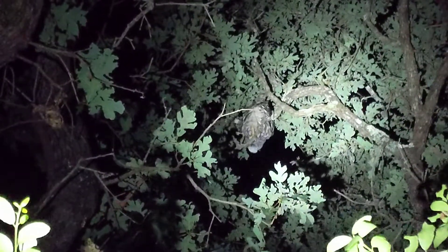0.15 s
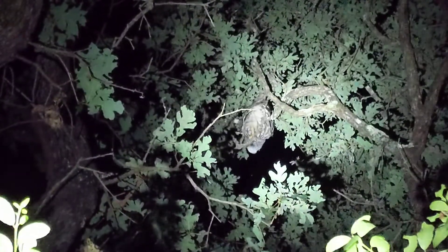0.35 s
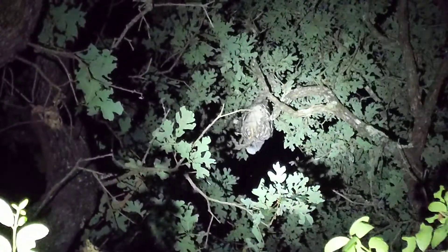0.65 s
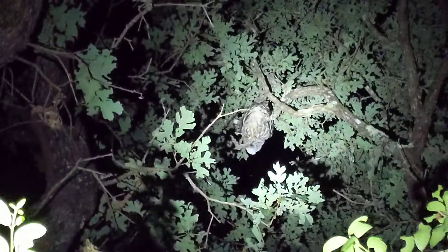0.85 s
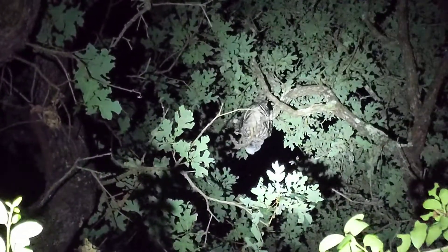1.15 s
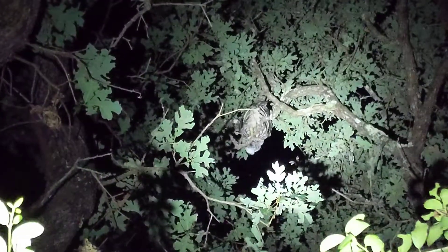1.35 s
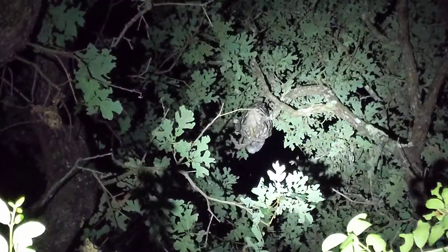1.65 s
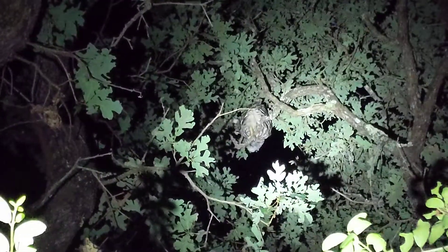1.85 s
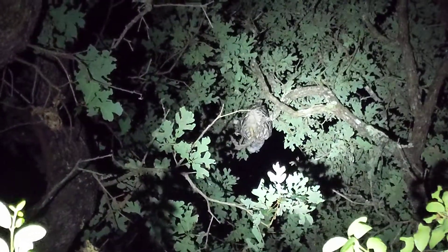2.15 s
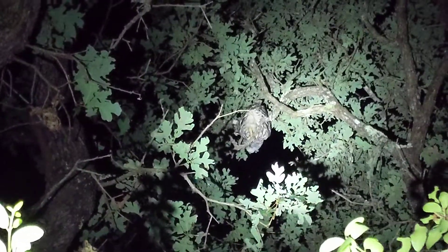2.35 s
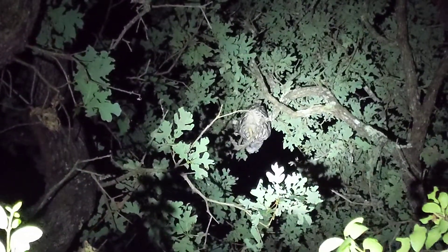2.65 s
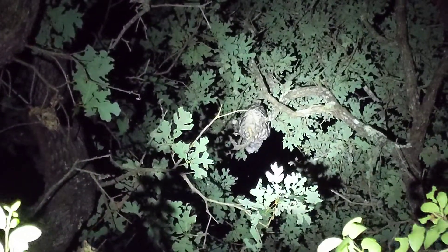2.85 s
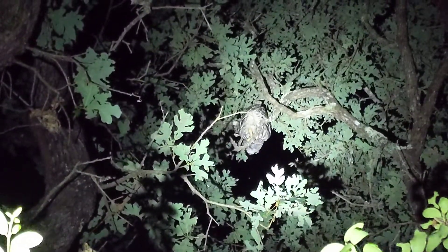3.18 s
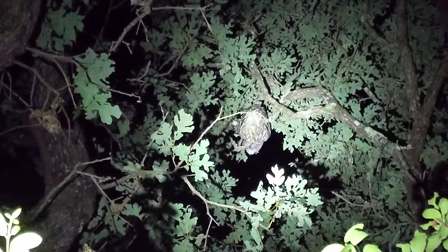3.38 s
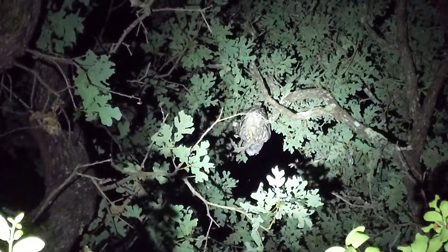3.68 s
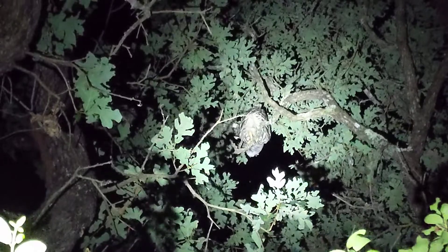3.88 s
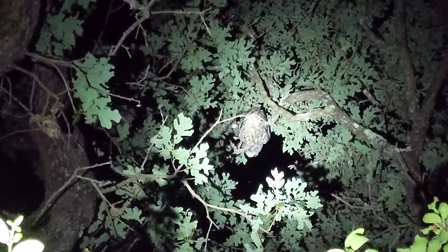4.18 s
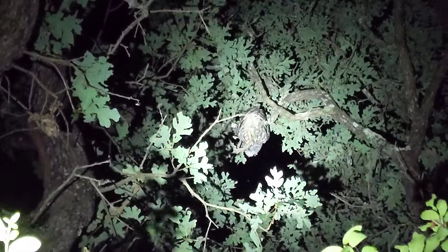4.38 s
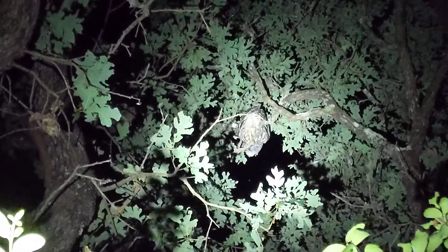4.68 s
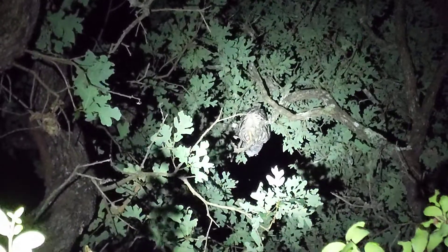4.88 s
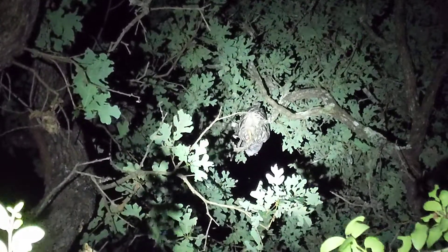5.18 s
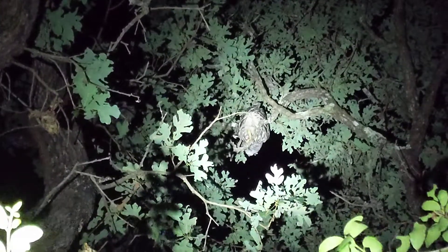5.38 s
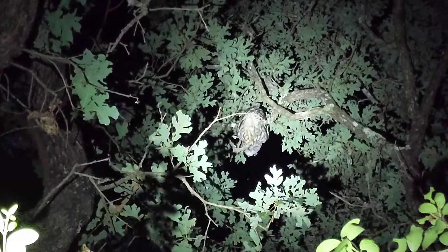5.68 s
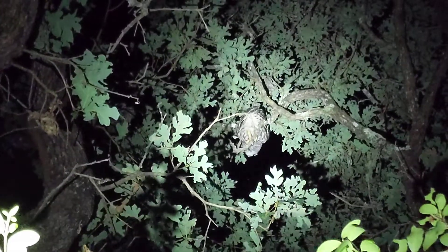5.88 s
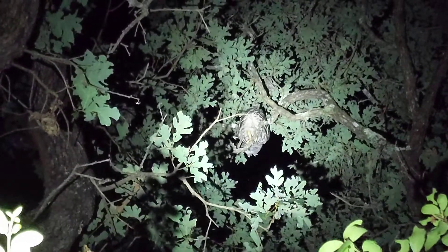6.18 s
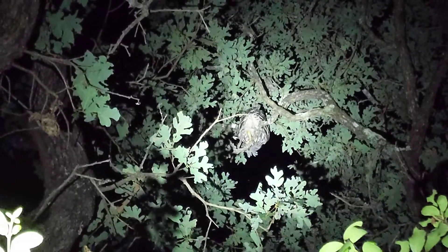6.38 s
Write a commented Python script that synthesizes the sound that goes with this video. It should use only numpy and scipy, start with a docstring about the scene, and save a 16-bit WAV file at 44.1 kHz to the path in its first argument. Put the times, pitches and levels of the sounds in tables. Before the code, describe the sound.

In a quiet wood at night, an owl just above the microphone gives three quick hoots and a long final one, each rising from a creak to a clear note and dropping. Afterwards soft crickets and a distant insect chorus carry on. Off to the left, a small animal makes a few faint squeaks, and later four sharp, high ones.

```python
"""A barred owl hoots close overhead in an oak wood at night: three short calls, then a long one.
Each hoot climbs from a creak, flips up to a nearly pure high note, drops back and collapses.
Off to the left a small animal squeaks faintly, then four times sharply near the end.
To the right two crickets chirp with their wings; farther out, insects trill and a chorus hums.
Leaves and trunks throw the nearer calls back to the microphone over a low murmur of air."""
import sys
import numpy as np
from scipy import signal
from scipy.fft import rfft, irfft, next_fast_len
from scipy.io import wavfile
from scipy.ndimage import uniform_filter1d, map_coordinates

SR = 44100
rng = np.random.default_rng(int(sys.argv[2]) if len(sys.argv) > 2 else 0)


def unload_wav(signal):
    """Save mono or channel-first audio to the path in sys.argv[1] as 16-bit WAV at rate SR, clipped to [-1, 1]."""
    wavfile.write(
        sys.argv[1],
        SR,
        np.round(np.clip(np.atleast_2d(signal).T, -1, 1) * 32767).astype(np.int16),
    )


N = 287973

# the owl's hoots: start t/s, flip up t/s, drop back t/s, end t/s, f/Hz before the flip, top f/Hz,
# high-note gain/dB, brightness/dB
OWL_HOOTS = [(.061, .141, .169, .222, 336, 478, -1.5, -2.5), (.385, .464, .503, .556, 356, 497, -2, -3),
             (.703, .78, .823, .876, 364, 514, -2.5, -1), (.896, .957, 1.188, 1.507, 385, 590, 0, -1)]
# its throat with the bill closed: f/Hz, relative level/dB
OWL_THROAT = [(140, -19), (240, -15), (290, -10.5), (340, -4.5), (480, 3.5), (610, 0.5), (760, -9),
              (940, -8), (1230, -18), (1330, -32.5), (1430, -18), (1880, -30), (2150, -24), (2600, -43),
              (3800, -53)]
# its voice, weak as a creak and loudest on the throat's resonance: pitch f/Hz, level/dB
OWL_LOUDNESS = [(145, -54), (195, -49.5), (243, -41), (300, -41), (385, -41), (455, -33), (500, -30),
                (550, -33), (590, -32.5)]
# the small animal's squeaks: t/s, length/s, rise/s, top f/Hz, level/dB ahead of the mouth
ANIMAL_SQUEAKS = [(2.766, 0.026, .019, 2940, -70.5), (3.073, .016, .011, 2850, -61.5),
                  (3.102, 0.018, 0.0086, 2680, -64), (3.132, .013, 0.012, 2700, -57),
                  (3.167, 0.015, 0.013, 3240, -51), (5.702, .020, .012, 3355, -37),
                  (5.889, 0.037, .018, 3342, -35), (6.105, 0.029, 0.021, 3106, -38),
                  (6.357, .032, .034, 2995, -37.5)]
# its mouth: f/Hz, gain/dB
ANIMAL_MOUTH = [(3500, 0.5), (5200, -2.5), (5950, -10), (6700, -25), (7400, -23), (8200, -13.5),
                (9000, -29.5), (10000, -24.5), (11500, -37), (13500, -48)]
# the near cricket's drifting tempo: t/s, chirp rate/Hz
NEAR_TEMPO = [(0.0, 4.7), (0.6, 4.219), (2.5, 4.662), (4.3, 4.39), (4.7, 4.603), (5.2, 4.263), (6.2, 4.515),
              (6.5, 3.646)]
# the far cricket's even bouts: first chirp t/s, last chirp t/s, approximate period/s
FAR_BOUTS = [(.18, 1.23, .26), (1.455, 2.55, .22), (2.8, 3.985, .237), (4.675, 5.365, .23),
             (5.96, 6.43, .235)]
# wing strokes in one chirp of each cricket: delay/s, f/Hz, relative level/dB
NEAR_STROKES = [(0, 3920, 1.5), (0.02, 4100, 4.5), (.030, 4020, 5), (.039, 3870, -3), (0.046, 4110, 7),
                (.056, 4080, 7.5), (0.067, 4050, 1.5), (.081, 4100, 2.5), (.096, 4140, -2.5)]
FAR_STROKES = [(0, 4300, -0.5), (.008, 4310, -6), (.023, 4330, -1), (.031, 4330, -5.5), (.05, 4340, -15)]
# short pauses in the thin trill: t/s
TRILL_GAPS = [.61, 1.12, 1.5, 1.84, 2.15, 2.95, 3.39, 3.82, 4.17, 5.08, 5.43, 5.78]
# the distant tree cricket swells and fades: t/s, level/dB
TREE_CRICKET_SWELL = [(2.95, -96), (3.3, -77), (4.2, -74), (5.3, -88)]
# far night choruses: f/Hz, width/Hz, level/dB, left over right/dB
FAR_CHORUSES = [(1560, 290, -83, -5.5), (2574, 198, -74.5, 4), (3150, 400, -77, 4.5),
                (3540, 250, -75.5, -5.5), (4020, 270, -77, -7), (5396, 730, -77.5, -1.5)]
# night air: f/Hz, relative level/dB
AIR_SPECTRUM = [(20, 0), (45, -6), (62, -3.5), (90, -4.5), (140, -16), (260, -16.5), (400, -14), (500, -6),
                (585, -0.5), (700, -11.5), (890, -14.5), (1100, -27.5), (1500, -22.5), (2200, -31.5),
                (4000, -90)]
# how alike that air is on the two sides: f/Hz, correlation
AIR_LIKENESS = [(60, 1), (130, 0.45), (300, 0.29), (600, 0.77), (1400, 0.17), (2400, .3)]
# fine hiss: f/Hz, relative level/dB
HISS_SPECTRUM = [(1900, -6), (2500, 1), (4700, 0.5), (6000, 0), (7000, -2.5), (8000, -1), (9000, -6),
                 (9800, -1), (11000, -9), (12000, 0.5), (13000, -10), (16000, -3)]
# soft high puffs of hiss: t/s, level/dB
HISS_PUFFS = [(2.52, -71.5), (5.041, -71.5)]
# how long the trunks ring: f/Hz, t60/s
TRUNK_DECAY = [(200, 0.82), (550, 1.47), (1500, 0.19), (3200, 0.56), (10000, 0.26)]

CREAK_HZ, CLIMB_S = 158.6, .025  # a hoot's starting pitch and the time constant of its climb
JUMP, SCOOP_S = 1.18, .01  # pitch ratio of the flip; base time constant of the scoop to the top
SCOOP_SHARE, DROOP_FROM = .032, .62  # shares of the high note: added to SCOOP_S; passed before it droops
LAND_HZ, SAG_HZ_PER_S = 351.4, 395  # back in the low register the pitch sags
END_HZ, COLLAPSE_S = 146.4, .069  # the air runs out and the pitch collapses
ATTACK_S, ATTACK_DB, FADE_DB_PER_S = .028, 6.5, 7.5  # a hoot starts softly and fades on its way down
GLIDE_S = .0082  # time for a change of register
SQUEAK_START_HZ = 2599
FIRST_CHIRP_S, NEAR_DB, FAR_DB = -.017, -55.5, -62.5
TRILL_DB, PAUSE_DIP_DB, PAUSE_S = -74.5, 16.5, .033
RUMBLE_DB, SWELL_DB, SWELL_AT_S, SWELL_S = -70.5, 2, 5.4, .2  # the rumble grows a little near the end
PUFF_S = .042  # half-length of a puff
TOP_HZ = 15800


def owl():
    """Close overhead, a gliding harmonic voice: creaky when low, then buzzy, nearly pure when high."""
    pitch, db, effort_db, voiced = hooting(clock())
    high = ramp(pitch, 370, 130)  # the upper register
    creak = np.clip((255 - pitch) / 90, 0, 1)  # slack, separate pulses at both ends of a hoot
    rough = 1 - .85 * high
    jitter = .016 * wobble(420) + .006 * wobble(70)
    phase = 2 * np.pi * np.cumsum(pitch * (1 + rough * jitter)) / SR
    n = np.flatnonzero(voiced > .01)[-1]  # the last hoot ends here
    k = np.arange(1, 17)[:, None]
    hz = k * pitch[:n]
    # slack pulses ring the upper throat resonance and little above it
    creak_db = 14 * np.exp(-((hz - 1220) / 170) ** 2) - 8 * (hz > 1400)
    # the high register vibrates almost symmetrically, so its even harmonics fade
    high_db = -6.5 * (k % 2 == 0) - .4 * (k > 1)
    register_db = creak[:n] * creak_db + high[:n] * high_db
    flutter = np.array([wobble(55)[:n] for _ in k])
    flutter_db = 2.2 * flutter * np.clip(hz / 600 - 1, 0, 1.6) * rough[:n]
    bright_db = effort_db[:n] * ramp(hz, 1000, 700)
    partials = amp(along(OWL_THROAT, hz) + register_db + bright_db + flutter_db)
    partials /= np.sqrt(np.sum(partials ** 2, axis=0) / 2)
    voice = np.pad(np.sum(partials * np.cos(k * phase[:n] - throat_lag(hz)), axis=0), (0, N - n))
    breath = amp(-38.5) * noise(OWL_THROAT)[0] + amp(-34.5) * band(1900, 700)[0]
    sizzle = amp(-40.5) * band(9800, 3500)[0]
    rasp = (1 + np.cos(phase)) * rough * (breath + sizzle)  # turbulence escapes once a cycle
    level = amp(db + .5 * rough * wobble(180)) * voiced
    call = place(level * (voice + rasp), lag_ms=.11)
    return call + echoes(call, leaves_db=-19, leaves_t60=.23, wood_db=-22.5)


def hooting(t):
    """Pitch, level, brightness and voicing of the hoots; the level follows the pitch."""
    pitch = np.full(N, CREAK_HZ)
    gain_db, effort_db, voiced = np.zeros((3, N))
    for start, up, down, end, flip_hz, top_hz, high_db, bright_db in OWL_HOOTS:
        on = (t >= start) & (t < end)
        u = t[on]
        pitch[on] = hoot_pitch(u, start, up, down, end, flip_hz, top_hz)
        attack_db = ATTACK_DB * (ramp(u, start, ATTACK_S) - 1)
        gain_db[on] = np.select([u < up, u < down], [attack_db, high_db], -FADE_DB_PER_S * (u - down))
        effort_db[on], voiced[on] = bright_db, 1
    pitch = np.exp(uniform_filter1d(np.log(pitch), size=int(GLIDE_S * SR)))
    db = uniform_filter1d(along(OWL_LOUDNESS, pitch) + gain_db, size=400)
    return pitch, db, effort_db, uniform_filter1d(voiced, size=140)


def hoot_pitch(t, start, up, down, end, flip_hz, top_hz):
    """Climb from a creak, flip up to an arched high note, drop back, sag and collapse."""
    climbed = np.expm1((start - t) / CLIMB_S) / np.expm1((start - up) / CLIMB_S)
    climb = CREAK_HZ + (flip_hz - CREAK_HZ) * climbed
    scoop = np.exp(-np.abs(t - up) / (SCOOP_S + SCOOP_SHARE * (down - up)))
    droop = np.sin(np.pi / 2 * ramp((t - up) / (down - up), DROOP_FROM, 1 - DROOP_FROM)) ** 2
    arch = JUMP * flip_hz + (top_hz - JUMP * flip_hz) * (1 - scoop) * (1 - droop)
    sag = LAND_HZ - SAG_HZ_PER_S * (t - down)
    air = ramp(end - t, 0, min(COLLAPSE_S, end - down))
    return np.select([t < up, t < down], [climb, arch], END_HZ + (sag - END_HZ) * air)


def throat_lag(hz):
    """The phase by which the throat's resonances delay each frequency."""
    grid = np.fft.fftfreq(8192, 1 / SR)
    lag = signal.hilbert(np.log(amp(along(OWL_THROAT, np.abs(grid))))).imag
    return np.interp(hz, grid[grid >= 0], lag[grid >= 0])


def small_animal():
    """In the foliage left of the microphone, each squeak sweeps up quickly, rasping on the way."""
    calls = np.zeros(N)
    k = np.arange(1, 5)[:, None]
    for s, length, rise, top_hz, db in ANIMAL_SQUEAKS:
        t = np.arange(int(length * SR)) / SR
        sweep = np.sin(ramp(t, 0, rise) * np.pi / 2) ** 2
        pitch = SQUEAK_START_HZ + (top_hz - SQUEAK_START_HZ) * sweep
        phase = 2 * np.pi * np.cumsum(pitch) / SR
        tone = np.sum(amp(along(ANIMAL_MOUTH, k * pitch)) * np.sin(k * phase), axis=0)
        rasp_gain = amp(-12.5) * (top_hz / SQUEAK_START_HZ - 1) * np.sin(np.pi * sweep) ** 2
        rasp = rasp_gain * band(5560, 2600)[0, :len(t)]
        add(calls, s, np.sqrt(2) * amp(db) * np.sin(np.pi * t / length) * (tone + rasp))
    calls = place(calls, lag_ms=.66)
    # the early squeaks come from deeper in the foliage: duller, farther left, with more echo
    early = clock() < 5
    near = place(calls * ~early, pan_db=3)
    far = place(filtered(calls * early, lambda hz: 1 / (1 + (hz / 6500) ** 8)), pan_db=7)
    return near + far + echoes(near + amp(7.5) * far, leaves_db=-9, leaves_t60=.1, wood_db=-20)


def crickets():
    """Two crickets on the right drift in and out of step, one near, one higher and farther off."""
    t = clock()
    count = np.cumsum(np.interp(t, *np.transpose(NEAR_TEMPO))) / SR
    near_chirps = FIRST_CHIRP_S + np.interp(np.arange(count[-1]), count, t)
    far_chirps = np.concatenate([np.linspace(first, last, round((last - first) / period) + 1)
                                 for first, last, period in FAR_BOUTS])
    near = stridulate(near_chirps, NEAR_DB, NEAR_STROKES, overtone_db=-29, attack_s=.00075, ring_s=.0071)
    far = stridulate(far_chirps, FAR_DB, FAR_STROKES, overtone_db=-9, attack_s=.003, ring_s=.0072)
    song = place(near, lag_ms=.5537, pan_db=-2.5) + place(far, pan_db=-6)
    return song + echoes(song, leaves_db=-8, leaves_t60=.095, wood_db=-14.5)


def stridulate(chirps, db, strokes, overtone_db, attack_s, ring_s):
    """Chirps made of wing strokes that start sharply and ring off, no two quite alike."""
    song = np.zeros(N)
    t = np.arange(SR // 60) / SR
    shape = (1 - np.exp(-t / attack_s)) * np.exp(-(t / ring_s) ** 2)
    for s in chirps:
        for delay, hz, stroke_db in strokes:
            late, sharp, strong = rng.standard_normal(3)
            phase = 2 * np.pi * hz * (1 + .011 * sharp) * t
            stroke = shape * (np.sin(phase) + amp(overtone_db) * np.sin(2 * phase))
            add(song, s + delay * (1 + .03 * late), amp(db + stroke_db + 1.3 * strong) * stroke)
    return song


def trilling_insect():
    """Farther out on the right, a thin trill from wings that beat about fifty times a second."""
    db = TRILL_DB - PAUSE_DIP_DB * sum(np.exp(-((clock() - s) / PAUSE_S) ** 2) for s in TRILL_GAPS)
    beat = np.cumsum(53 * (1 + .032 * wobble(5.4))) / SR
    carrier = np.sin(2 * np.pi * np.cumsum(5400 + 60 * wobble(200)) / SR)
    song = unit(np.abs(np.sin(np.pi * beat)) ** 3 * carrier * amp(2 * wobble(30)))
    song = place(song * amp(db), lag_ms=-.34, pan_db=-4)
    return song + echoes(song, leaves_db=-8.5, leaves_t60=.1, wood_db=-6.5)


def tree_cricket():
    """Very far from the microphone, a trill smeared into a wavering tone."""
    s, db = np.transpose(TREE_CRICKET_SWELL)
    return amp(np.interp(clock(), s, db)) * place(band(2880, 81), pan_db=1)


def far_chorus():
    """Deep in the wood on both sides, night choruses blur into flickering bands of noise."""
    return sum(place(band(hz, width), pan_db=pan) * amp(db + .3 * wobble(2) + 2.3 * wobble(50))
               for hz, width, db, pan in FAR_CHORUSES)


def night_air():
    """A far low rumble; louder on the left, a murmur of air and a fine flickering hiss with two puffs."""
    t = clock()
    spread = lambda hz: np.arccos(np.clip(along(AIR_LIKENESS, hz), -1, 1)) / 2
    mid, side = filtered(noise(AIR_SPECTRUM),
                         lambda hz: np.array([np.cos(spread(hz)), np.sin(spread(hz))]))
    air = unit(np.array([mid + side, mid - side]))
    low = filtered(air, lambda hz: 1 / (1 + (hz / 230) ** 4))
    rumble = unit(low) * amp(RUMBLE_DB + SWELL_DB * ramp(t, SWELL_AT_S, SWELL_S))
    murmur = place(air - low, lag_ms=.84, pan_db=4.5) * amp(-66.5 + .37 * wobble(2.01))
    hiss = amp(-72.5 + .8 * wobble(10)) * place(noise(HISS_SPECTRUM), pan_db=6)
    swells = sum(amp(db) * np.exp(-((t - s) / PUFF_S) ** 2) for s, db in HISS_PUFFS)
    puffs = swells * amp(1.7 * wobble(90)) * place(band(13000, 5500), pan_db=9)
    return rumble + murmur + hiss + puffs


def echoes(x, leaves_db, leaves_t60, wood_db):
    """Quick scatter from nearby leaves, then the long answer of the trunks."""
    hz, t, spectra = signal.stft(rng.standard_normal((2, SR)), SR, nperseg=256)
    decay = amp(-60 * t / along(TRUNK_DECAY, hz)[:, None]) * (1 - np.exp(-t / .0059))
    trunks = signal.istft(spectra * decay, SR, nperseg=256)[1][:, :SR]
    t = np.arange(SR) / SR
    leaves = rng.standard_normal((2, SR)) * amp(-60 * t / leaves_t60) * (1 - np.exp(-t / .017))
    tail = (amp(leaves_db) * unit(leaves) + amp(wood_db) * unit(trunks)) / np.sqrt(SR)
    return signal.fftconvolve(x, tail, axes=1)[:, :N]


def place(x, lag_ms=0, pan_db=0):
    """Stereo spread: the left channel is delayed by lag_ms and louder by pan_db."""
    side = np.array([[.5], [-.5]])
    return filtered(x, lambda hz: amp(side * pan_db) * np.exp(-2j * np.pi * hz * side * lag_ms / 1000))


def amp(db):
    """Decibels to gain."""
    return 10 ** (np.asarray(db) / 20)


def unit(x):
    """Scale to rms 1."""
    return x / np.sqrt(np.mean(x ** 2) + 1e-20)


def clock():
    """Time of every sample."""
    return np.arange(N) / SR


def ramp(x, start, length):
    """0 before start, rising evenly to 1 over length."""
    return np.clip((x - start) / length, 0, 1)


def along(points, hz):
    """Interpolate (f/Hz, value) points on a log frequency axis."""
    f, v = np.transpose(points)
    return np.interp(np.log(hz + 1), np.log(f + 1), v)


def wobble(rate):
    """A smooth random curve, rate knots a second."""
    knots = rng.standard_normal(int(N * rate / SR) + 4)
    return map_coordinates(knots, [np.arange(N) * rate / SR], order=2)


def filtered(x, response):
    """Pass x through a complex frequency response."""
    m = next_fast_len(N + SR // 2)
    return irfft(rfft(x, m) * response(np.fft.rfftfreq(m, 1 / SR)), m)[..., :N]


def noise(spectrum):
    """Two unrelated coloured noises of rms 1."""
    return unit(filtered(rng.standard_normal((2, N)), lambda hz: amp(along(spectrum, hz))))


def band(centre_hz, width_hz):
    """Two unrelated bands of noise of rms 1."""
    white = rng.standard_normal((2, N))
    return unit(filtered(white, lambda hz: 1 / (1 + ((hz - centre_hz) / width_hz * 2) ** 4) ** .5))


def add(track, s, sound):
    """Mix a short sound in at time s."""
    i = round(s * SR) + np.arange(len(sound))
    inside = (i >= 0) & (i < N)
    track[i[inside]] += sound[inside]


def scene():
    """The wood from where the microphone stands: all the callers in the night air."""
    callers = owl() + small_animal() + crickets() + trilling_insect() + tree_cricket()
    return callers + far_chorus() + night_air()


def record(dry):
    """The camera keeps nothing above its band limit."""
    return filtered(dry, lambda hz: hz < TOP_HZ)


dry = scene()
out = record(dry)
unload_wav(out)
```